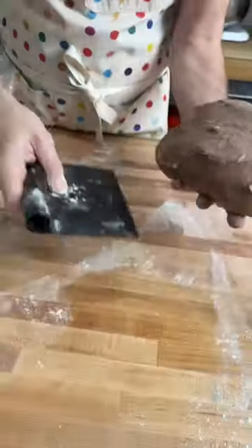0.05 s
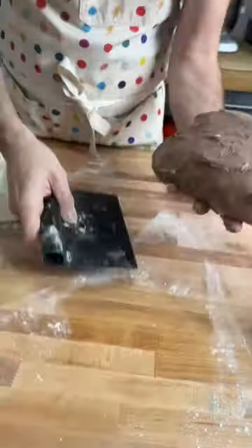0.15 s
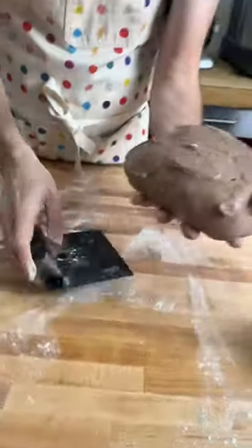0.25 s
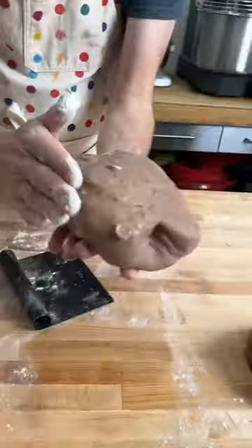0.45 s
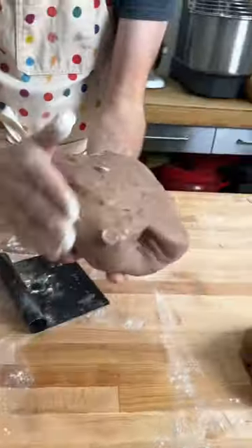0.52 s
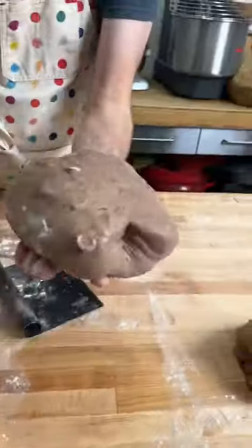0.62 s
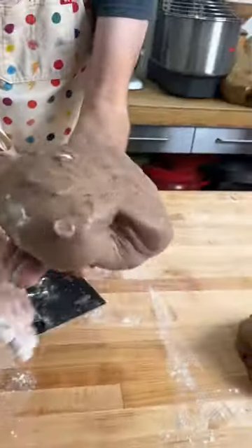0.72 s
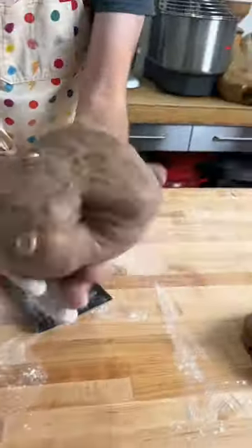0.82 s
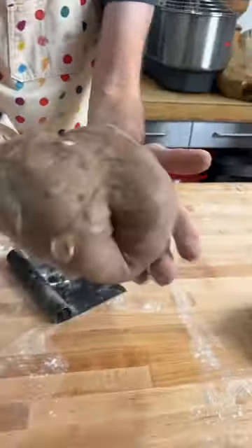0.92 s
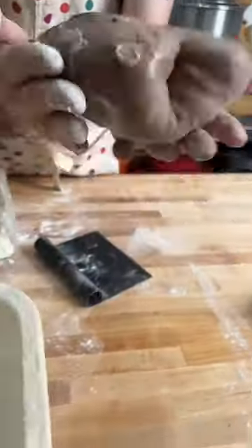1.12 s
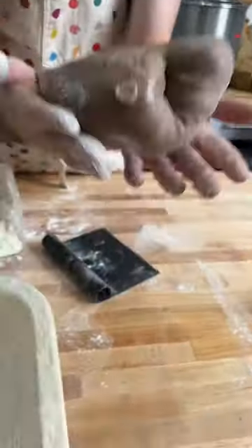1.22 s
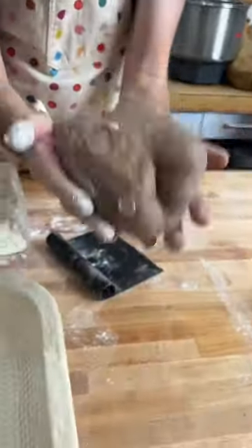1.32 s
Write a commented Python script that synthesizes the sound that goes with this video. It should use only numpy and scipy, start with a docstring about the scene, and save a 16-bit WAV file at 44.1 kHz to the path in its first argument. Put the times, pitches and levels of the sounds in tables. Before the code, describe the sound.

Ringing clatter of a metal dough scraper dropped on wood, followed by faint dough handling.

```python
"""A kitchen appliance hums throughout, and floury hands brush faintly over a lump of dough.
At 0.19 s a steel bench scraper is put down on a wooden counter, edge first. From 0.26 s it tips over,
drops flat and clatters to rest: each hit makes the blade clack and ring, and the wood boom.
From about 0.55 s the hands brush the dough again with a soft hiss. From 0.78 s fingers also pat it,
popping tiny pockets of air, and at 0.94 s the dough lands in a palm with a low thud."""
import sys
import numpy as np
from scipy import signal
from scipy.fft import rfft, irfft
from scipy.io import wavfile
from scipy.ndimage import uniform_filter1d

SR = 44100
rng = np.random.default_rng(int(sys.argv[2]) if len(sys.argv) > 2 else 0)


def unload_wav(signal):
    """Save mono or channel-first audio to the path in sys.argv[1] as 16-bit WAV at rate SR, clipped to [-1, 1]."""
    wavfile.write(
        sys.argv[1],
        SR,
        np.round(np.clip(np.atleast_2d(signal).T, -1, 1) * 32767).astype(np.int16),
    )


N = 59535

# Hits while the scraper is still held.
# Each row: start in seconds, level in dB, then bass, treble, ring and crack, each in dB.
HELD_HITS = [(.191, -24, -1, -10.5, 6.5, -10), (.1986, 2, -5.5, 0, 0, -2.5), (.2015, -2, -4.5, 3, -4, -1.5),
             (.2125, -8, 2.5, -2.5, -3, -6), (.223, -2.5, 6, -10, -6.5, -7), (.238, -9.5, -1.5, 3, -4, -12)]
# Hits as the scraper drops flat and rocks to rest; the row at 0.3163 s is the quick echo
# of the hit just before it. The columns are the same as above.
FREE_HITS = [(0.261, -21.5, 7.5, -15.5, 9, -14), (.274, -10.5, 10, -12, -3, -5.5),
             (.281, -14, 5.5, -10, -1.5, -6), (.297, -24.5, 9, -6.5, 13.5, -10),
             (.3147, -1, -1, -7, 0, 9.5), (0.3163, -3, -2, -3.5, -2.5, 6.5), (.331, -6.5, 5.5, 8, -1.5, -9),
             (.3405, -2.5, -2, 8.5, -2, 2.5), (.3485, -10.5, 2, 14, -1, -9.5), (.356, -6, -5, 5, -1, -8.5),
             (.367, -5, 2, 6, 1.5, 0.5), (.383, -9, 7.5, -4, -9, -7), (.401, -7, -2.5, -32.5, 3, 3.5),
             (.4095, -13.5, -3.5, -20, -4, 10), (0.425, -22.5, 0, 1.5, 8.5, 0.5)]
# The tones of the blade, held on its edge and lying free.
# Each row: pitch in Hz, level in dB, seconds to fade by 60 dB.
HELD_TONES = [(1103, -10, .25), (1499, -6, .2), (1579, -6, .25), (1940, -10, .25), (2212, -10, .2),
              (2594, 2, .35), (2750, -9, .3), (3240, 2, .2), (3384, 2, .11), (3664, -10, .3),
              (5605, -6, .15), (5960, -10, .11)]
FREE_TONES = [(569, -8, .14), (721, -7, .14), (930, -17, .3), (1111, -15, .25), (1161, -14, .28),
              (1434, -12, .14), (1516, -7, .15), (1586, 0, .48), (1683, -4, .1), (2202, -9, .2),
              (2290, -17, .35), (2602, -9, .22), (2694, -5, .14), (2741, -3, .17), (2906, -9, .17),
              (3011, -14, .17), (3243, -7, .13), (3467, -15, .5), (3516, -10, .14), (3666, -15, .5),
              (3763, -12, .22), (4280, -21, .25), (4718, -21, .3), (4885, -18, .2), (5010, -16, .22),
              (5580, -14, .2), (5808, -20, .42), (6170, -14, .15), (7010, -21, .33), (8105, -25, .25),
              (8560, -24, .2)]
# The clack of steel on wood. Each row: frequency in Hz, strength there in dB.
HELD_COLOUR = [(40, -21.5), (90, 0.5), (450, -9), (800, -5), (1100, -6), (1600, -7), (2300, -6.5),
               (3400, -3.5), (4100, -7.5), (5100, -16), (5700, -6), (7000, -13), (9300, -12), (11500, -17),
               (15000, -45.5)]
FREE_COLOUR = [(40, -31), (80, 0), (160, -3), (300, -3), (650, -4.5), (1300, -9), (1650, 2.5), (1950, -0.5),
               (2450, -6.5), (3500, -6), (4050, -10.5), (6000, -12), (8600, -18.5), (10500, -25.5),
               (13000, -48)]
# How long a clack lasts. Each row: frequency in Hz, seconds to fade by 60 dB.
CLACK_FADE = [(100, 0.11), (600, 0.22), (2000, 0.15), (9000, 0.19)]
# Where the scraper is heard. Each row: frequency in Hz, left level minus right level in dB.
LEFT_RIGHT = [(100, 1.5), (350, 1), (600, 0.5), (1100, 4), (1600, 0), (2200, -2.5), (2900, 0.5), (5500, 0),
              (10000, 0)]

def scraper(hits, tones, colour, clack_db, ring_db):
    """Each hit of steel on wood gives a sharp crack and a short clack, and sets the blade ringing."""
    rest_s, settle_s, damping_db = .425, 0.0067, -6.5  # once the blade lies still, the wood damps it
    settled = np.clip((np.arange(N) / SR - rest_s) / settle_s, 0, 1)
    pushes = [(start, db + ring) for start, db, _, _, ring, _ in hits]
    out = amp(ring_db + damping_db * settled) * ringing(pushes, tones)
    t = np.arange(SR // 3) / SR
    rise_s, crack_s = 0.0005, 0.0021
    pitches = [tone[0] for tone in tones]  # the clack is loudest around the blade's own tones
    for start, db, bass_db, treble_db, _, crack_db in hits:
        rise = 1 - np.exp(-t / rise_s)
        crack = 1 + amp(crack_db) * np.exp(-t / crack_s)
        clack = fade_bands(noise(colour, len(t), bass_db, treble_db, pitches), CLACK_FADE)
        add(out, start, amp(clack_db + db) * rise * crack * clack)
    balance_db = look_up(LEFT_RIGHT, np.fft.rfftfreq(2 * N, 1 / SR))
    return irfft(rfft(out, 2 * N) * amp([balance_db / 2, -balance_db / 2]))[:, :N]


# The low tones of the counter. Each row: pitch in Hz, level in dB, seconds to fade by 60 dB.
WOOD_TONES = [(76.3, -7.5, 0.25), (146, -1.5, .22), (172, -3.5, .15), (240.7, -4.5, 0.44)]

def counter():
    """The wood booms with the low part of the falling scraper's clatter."""
    pushes = [(start, db + bass_db) for start, db, bass_db, *_ in FREE_HITS]
    return amp(-32) * ringing(pushes, WOOD_TONES)


# Strokes of a palm. Each row: loudest moment, rise and fall in seconds, then level and treble in dB.
STROKES = [(0.029, 0.056, 0.04, -62.5, -9), (0.182, 0.055, 0.029, -55.5, -9.5),
           (.555, 0.026, 0.031, -56, 5.5), (.795, 0.023, 0.031, -48.5, -4.5), (.837, 0.037, 0.019, -54, 9),
           (.937, 0.019, 0.032, -53, -6.5), (1.03, 0.066, .04, -58.5, -5.5),
           (1.088, 0.039, 0.022, -52.5, -5.5), (1.284, .02, 0.028, -58.5, -7.5),
           (1.335, 0.035, 0.035, -58.5, -4.5)]
# The hiss of a stroke. Each row: frequency in Hz, strength there in dB.
STROKE_COLOUR = [(200, -8.5), (1200, -8.5), (2500, -2), (4200, -2.5), (5000, -6), (6500, 1.5), (8200, 1.5),
                 (11500, -3.5), (13000, -22.5)]

def palm_strokes():
    """Floury palms slide over the dough with a grainy hiss that swells and fades."""
    t, out = np.arange(N) / SR, np.zeros((2, N))
    grain_db, grain_s = 1, .002  # how much and how quickly the level flickers
    for peak, rise, fall, db, treble_db in STROKES:
        flicker = unit_level(uniform_filter1d(rng.standard_normal(N), round(grain_s * SR)))
        grain = unit_level(amp(grain_db * flicker))
        swell = np.exp(-((t - peak) / np.where(t < peak, rise, fall)) ** 2)
        out += amp(db) * swell * grain * noise(STROKE_COLOUR, N, treble_db=treble_db)
    return out


# Fingers tapping the dough. Each row: start in seconds, then level, bass and treble in dB.
TAPS = [(0.7813, -46.5, -4, 0), (.7908, -36.5, -20, -1), (0.804, -46, -5, 7), (0.809, -49, 29, 3),
        (0.932, -52.5, 24, -9), (1.223, -61, -4, -9), (1.274, -58.5, -0.5, 1.5)]
# The noise of a tap. Each row: frequency in Hz, strength there in dB.
TAP_COLOUR = [(80, -27), (600, -19), (1250, 7), (2100, -5), (2800, -12), (3500, -8), (5000, -23),
              (12000, -35)]
# Popping air pockets. Each row: pitch in Hz, level in dB, seconds to fade by 60 dB.
POP_TONES = [(1251, 2, 0.014), (2000, 0.5, 0.016), (3400, -4, 0.015)]

def finger_taps():
    """Fingers make short, dead taps on the dough, and small pockets of air pop under them."""
    t, out = np.arange(SR // 4) / SR, np.zeros((2, N))
    rise_s, fade_s = 0.00035, 0.02
    shape = (1 - np.exp(-t / rise_s)) * fade(t, fade_s)
    for start, db, bass_db, treble_db in TAPS:
        add(out, start, amp(db) * shape * noise(TAP_COLOUR, len(t), bass_db, treble_db))
    pops = ringing([(start, db) for start, db, *_ in TAPS], POP_TONES)
    return out + pops


# The dough landing in a palm. Each row: start in seconds, level in dB.
LANDINGS = [(.935, -39)]

def dough_thud(pitch_hz=115, peak_s=0.011):
    """The weight of the dough pushes on a palm with one low, quickly fading tone."""
    t, out = np.arange(SR // 4) / SR, np.zeros((2, N))
    swell = t / peak_s * np.exp(1 - t / peak_s)
    thud = swell * np.sin(2 * np.pi * pitch_hz * t)
    for start, db in LANDINGS:
        add(out, start, amp(db) * thud[None])
    return out


# The hum of the appliance. Each row: pitch in Hz, average level in dB.
HUM_TONES = [(127.6, -49.5), (184, -57), (254.5, -55.5), (303, -61), (365, -67)]
# The rush of air. Each row: frequency in Hz, strength there in dB.
AIR_COLOUR = [(20, -30.5), (32, -19), (48, -2.5), (90, -9), (140, -2), (200, -2), (320, -3), (450, -10),
              (800, -22), (1500, -28.5), (4000, -35), (10000, -42.5), (11800, -42), (13000, -64.5)]

def appliance(waver_depth=0.18, waver_hz=12):
    """An appliance hums with low, wavering tones in a soft rush of air."""
    t, hz = np.arange(N) / SR, np.fft.fftfreq(N, 1 / SR)
    out = amp(-52.5) * noise(AIR_COLOUR, N)
    for pitch_hz, db in HUM_TONES:
        slow_spectrum = np.exp(2j * np.pi * rng.random(N) - (hz / waver_hz) ** 2)
        waver = 1 + waver_depth * unit_level(np.fft.ifft(slow_spectrum))
        tone = np.exp(2j * np.pi * (pitch_hz * t + rng.random()))
        out += amp(db) * unit_level((waver * tone).real)
    return out


# How long the kitchen echoes. Each row: frequency in Hz, seconds to fade by 60 dB.
ROOM_FADE = [(100, 1), (500, 0.66), (1500, 0.52), (4000, 0.59), (7000, 0.49), (12000, .35)]

def kitchen_echo(sound, delay_s=0.005):
    """Sound bounces around the room and comes back as a smooth, fading tail."""
    hz = np.fft.rfftfreq(SR, 1 / SR)
    hiss = irfft(stereo(rfft(rng.standard_normal((2, SR))), hz))
    tail = fade_bands(hiss, ROOM_FADE) * (np.arange(SR) / SR > delay_s)
    return signal.fftconvolve(sound, tail / np.linalg.norm(tail[0]), axes=1)[:, :N]


# How wide the sound is. Each row: frequency in Hz, then the level in dB of the part
# that is opposite in left and right, compared with the part they share.
WIDTH = [(60, -29), (170, -18), (300, -19.5), (520, -4.5), (900, -2.5), (1550, -11), (2200, -6.5),
         (3500, -1.5), (6000, -12), (12000, 3.5)]

def stereo(spectra, hz):
    """Blends two unrelated noises so that left and right are partly alike."""
    shared, opposite = spectra
    width = amp(look_up(WIDTH, hz))
    return np.array([shared + width * opposite, shared - width * opposite]) / np.sqrt(1 + width ** 2)


def ringing(pushes, tones):
    """Each push (start in seconds, level in dB) feeds every tone of an object; in between they fade."""
    t = np.arange(N) / SR
    hz, db, fade_s = np.transpose(tones)[:, :, None]
    energy_left = fade(t, fade_s) ** 2
    energy, jolts = np.zeros((2, len(tones), N))
    for start, push_db in pushes:
        at, push = round(start * SR), amp(push_db)
        # A push also knocks each wave out of step, most of all when it is ringing only weakly.
        jolts[:, at] += rng.choice([-1, 1], len(tones)) * np.arctan2(push, np.sqrt(energy[:, at])) / 2
        add(energy, start, push ** 2 * energy_left)
    phase = 2 * np.pi * hz * t + np.cumsum(jolts, 1)
    lead = rng.choice([-1, 1], hz.shape) * np.arctan(amp(look_up(WIDTH, hz)))  # one side runs ahead
    level = amp(db) * np.sqrt(energy)
    return np.array([(level * np.sin(phase + side * lead)).sum(0) for side in (1, -1)])


def noise(colour, size, bass_db=0, treble_db=0, peaks=()):
    """Stereo noise shaped by a colour table, with bass and treble controls and optional narrow peaks."""
    bass_hz, treble_hz, peak_db, peak_width_hz = 556, 4500, 11, 27
    hz = np.fft.rfftfreq(size, 1 / SR)
    bass = amp(bass_db / (1 + (hz / bass_hz) ** 4))
    treble = amp(treble_db * (1 - 1 / (1 + (hz / treble_hz) ** 4)))
    near_peak = sum(1 / (1 + ((hz - peak) / peak_width_hz) ** 2) for peak in peaks)
    bumps = np.sqrt(1 + amp(peak_db) ** 2 * near_peak)
    shape = unit_level(amp(look_up(colour, hz)) * bumps)
    white = stereo(rfft(rng.standard_normal((2, size))), hz)
    return irfft(white * shape * bass * treble, size)


def fade(t, fade_s):
    """A gain that falls by 60 dB every fade_s seconds."""
    return np.exp(-np.log(1000) * t / fade_s)


def fade_bands(sound, fade_times):
    """Lets each band of frequencies die away at its own speed."""
    hz, t, bands = signal.stft(sound, SR, nperseg=256)
    faded = bands * fade(t, look_up(fade_times, hz)[:, None])
    return signal.istft(faded, SR, nperseg=256)[1][:, :sound.shape[1]]


def amp(db):
    """Turns decibels into a gain."""
    return 10 ** (np.asarray(db) / 20)


def unit_level(x):
    """Scales a signal so that its average (rms) level is 1."""
    return x / np.sqrt(np.mean(abs(x) ** 2) + 1e-20)


def look_up(table, hz):
    """Reads between the rows of a table, giving each octave about equal room."""
    row_hz, values = np.transpose(table)
    return np.interp(np.log(hz + 1), np.log(row_hz + 1), values)


def add(mix, start, sound):
    """Mixes a sound in at a start time in seconds."""
    part = mix[:, round(start * SR):][:, :sound.shape[1]]
    part += sound[:, :part.shape[1]]


def scene():
    """Scraper, counter and hands echo in the kitchen, over the hum."""
    on_edge = scraper(HELD_HITS, HELD_TONES, HELD_COLOUR, clack_db=-24, ring_db=-29)
    falling = scraper(FREE_HITS, FREE_TONES, FREE_COLOUR, clack_db=-15, ring_db=-17.5)
    hands = palm_strokes() + finger_taps() + dough_thud()
    near = on_edge + falling + counter() + hands
    return near + amp(-11.5) * kitchen_echo(near) + appliance()


def record(dry):
    """Rounds off the loudest peaks and cuts the highest treble."""
    ceiling, cutoff_hz = .92, 12700
    rounded = dry / (1 + (dry / ceiling) ** 6) ** (1 / 6)
    low_pass = signal.firwin(511, cutoff_hz, window=("kaiser", 9), fs=SR)
    return signal.oaconvolve(rounded, low_pass[None], "same")


dry = scene()
out = record(dry)
unload_wav(out)
```